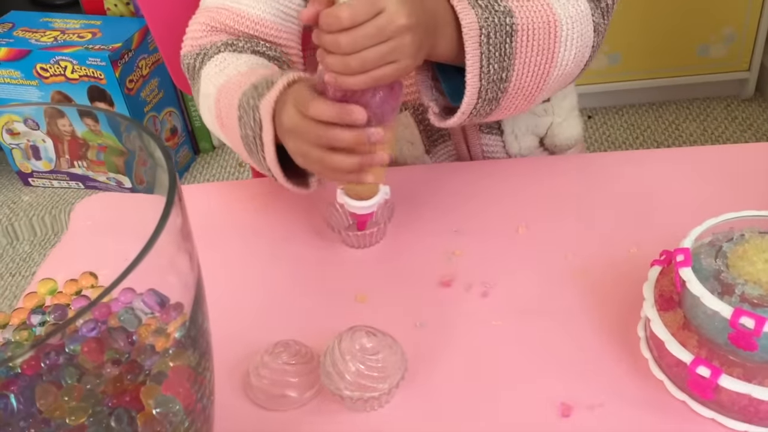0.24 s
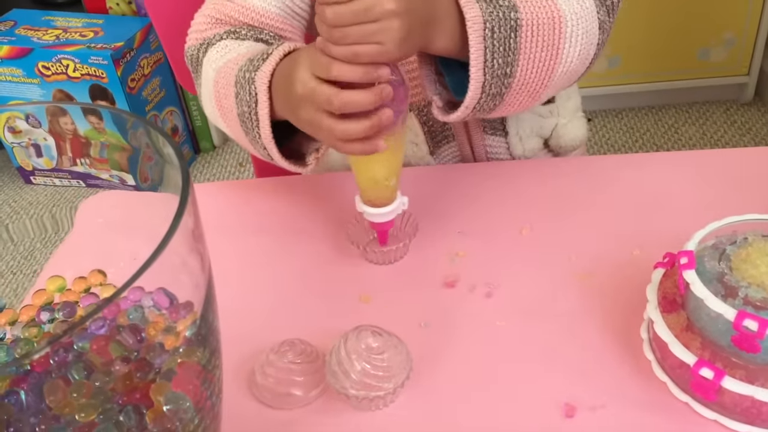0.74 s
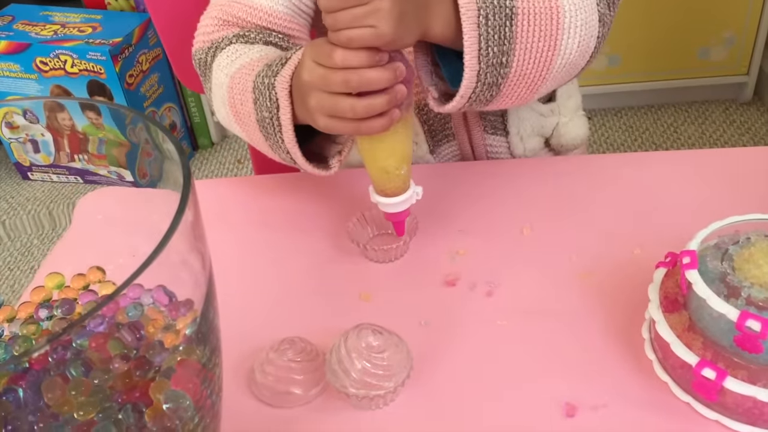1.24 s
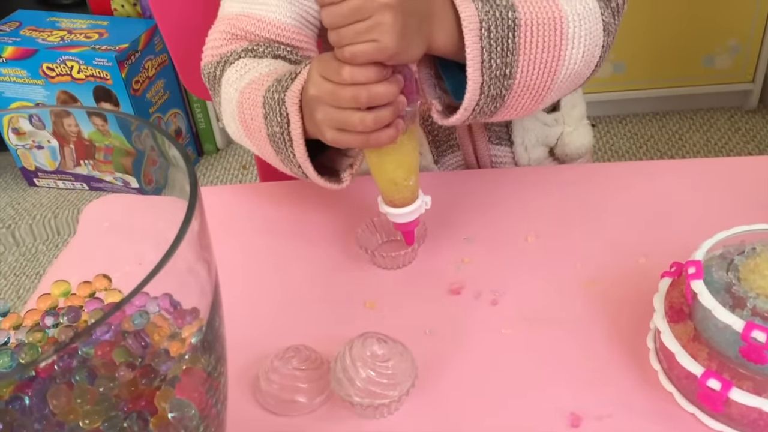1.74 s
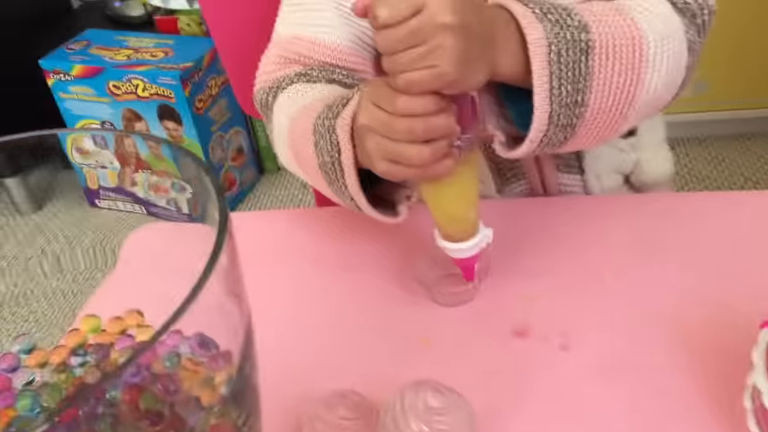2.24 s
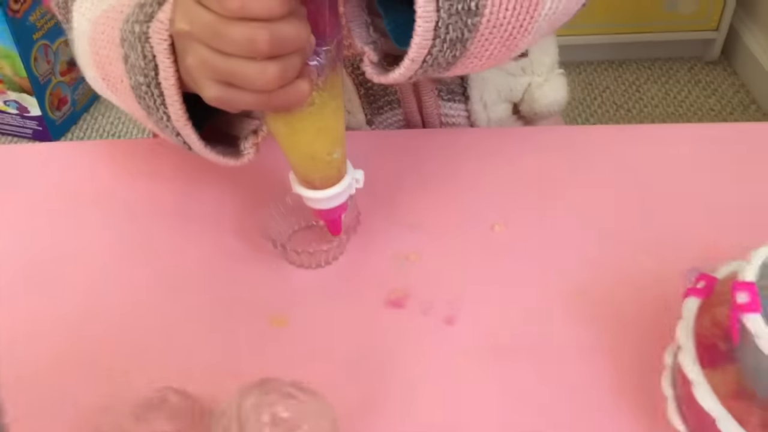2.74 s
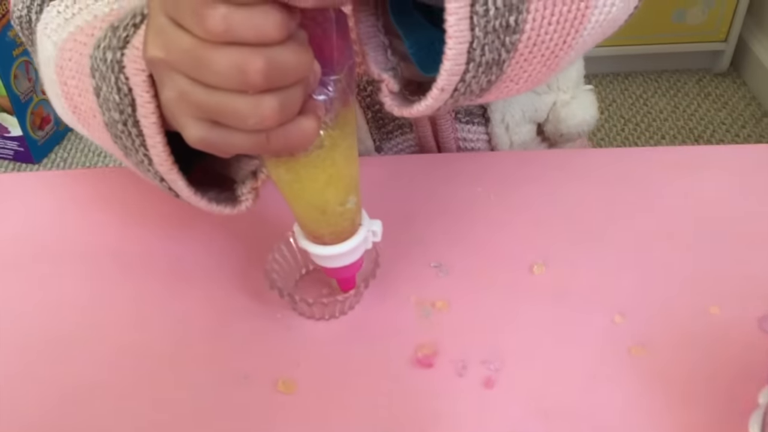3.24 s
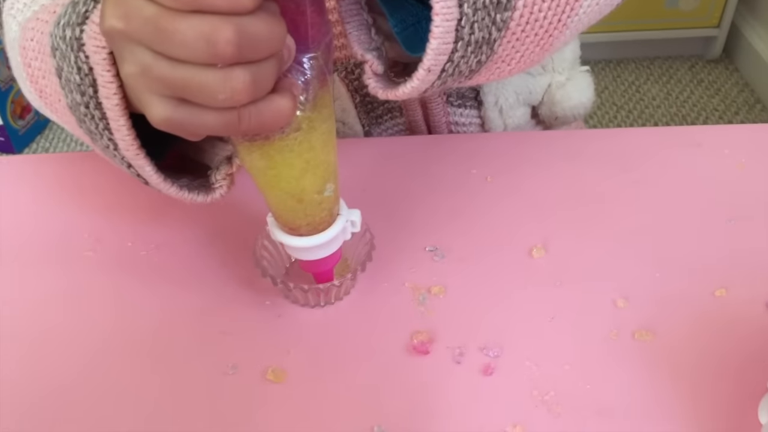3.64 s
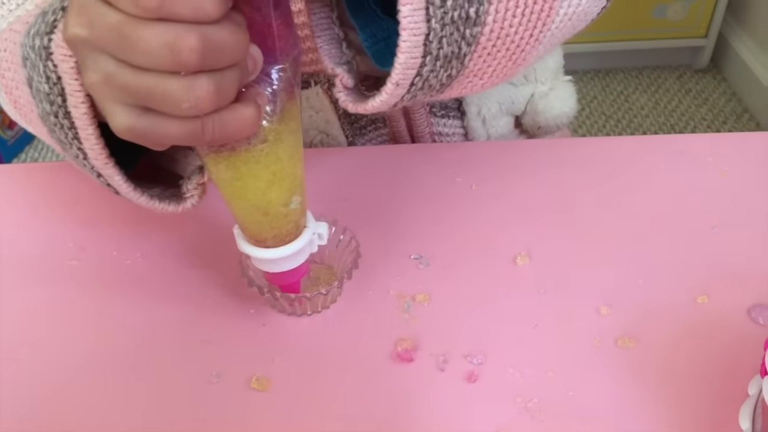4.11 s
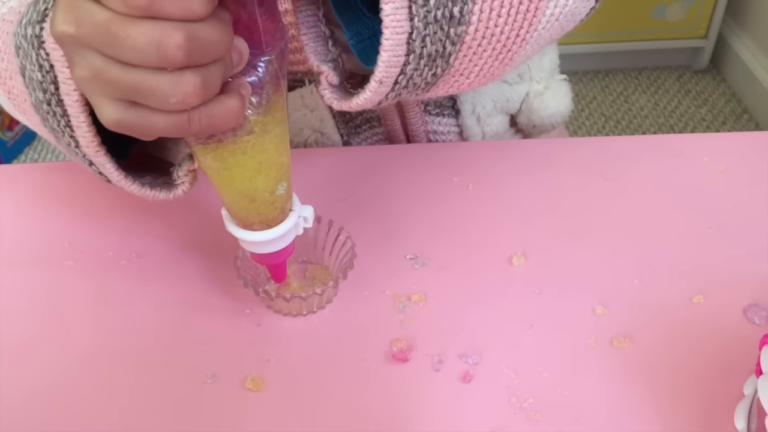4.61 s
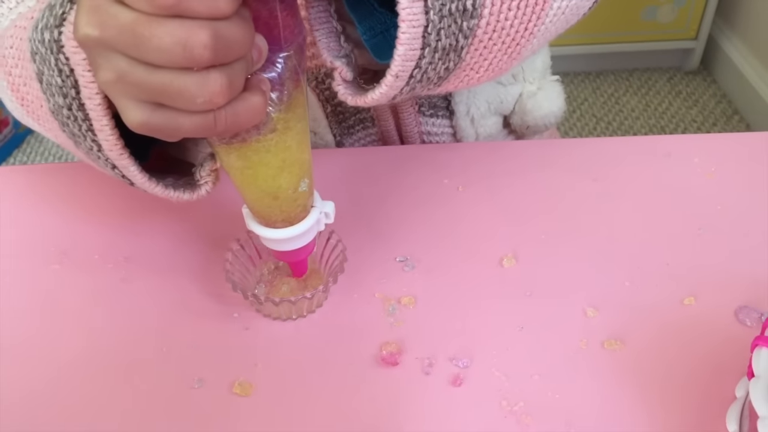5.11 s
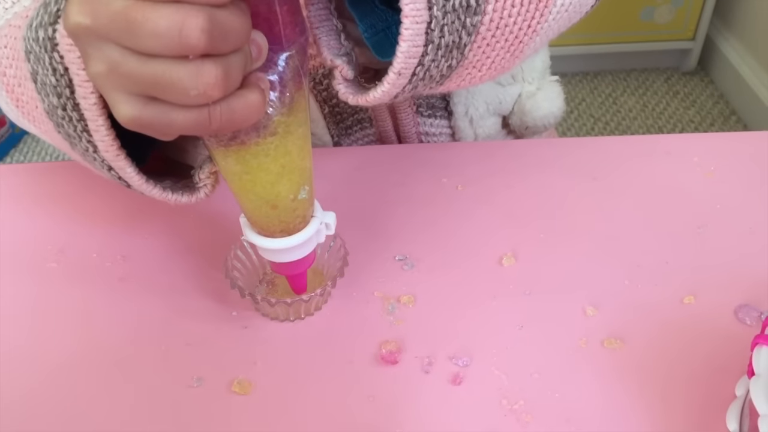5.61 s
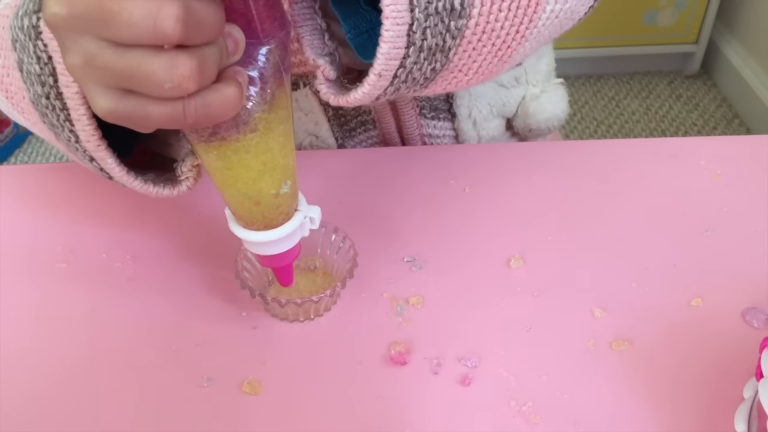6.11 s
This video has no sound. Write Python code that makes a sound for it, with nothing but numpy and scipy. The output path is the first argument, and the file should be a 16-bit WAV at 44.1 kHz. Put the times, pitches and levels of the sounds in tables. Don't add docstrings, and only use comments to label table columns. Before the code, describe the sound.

A small plastic cup is tapped and knocked down hard on a table, then wet gel beads in a squeezed bag fizz, snap and crackle.

```python
import sys
import numpy as np
from scipy import signal
from scipy.fft import rfft, irfft, next_fast_len
from scipy.io import wavfile
from scipy.ndimage import map_coordinates

SR = 44100
rng = np.random.default_rng(int(sys.argv[2]) if len(sys.argv) > 2 else 0)


def file_out(sig):
    cols = np.atleast_2d(sig).T
    lim = np.clip(cols, -1, 1)
    pcm = np.round(lim * 32767).astype(np.int16)
    wavfile.write(sys.argv[1], SR, pcm)


def volts_from_db(level):
    exponent = np.asarray(level, float) / 20
    return 10 ** exponent


N = 280476

# centre in Hz, width in Hz, level in dB.
FOLDS = [
    [(5845, 2460, 0), (7460, 2100, 0)],
    [(8950, 1940, 0), (11750, 720, -4)],
    [(14800, 10700, 0.5)],
]
# centre in Hz, width in Hz, level in dB.
CUP = [(1710, 770, -2.5), (2845, 680, 2.5), (4290, 710, -2)]
# centre in Hz, width in Hz, level in dB.
TIP = [(5400, 3500, -18), (6840, 680, 2), (9150, 960, 3.5), (10430, 760, 3), (11900, 1400, -3),
       (15000, 1300, -4.5)]
# centre in Hz, width in Hz, level in dB.
WALL = [(1475, 780, 3), (2660, 1500, 4)]


def unit(x):
    return x / np.sqrt(np.mean(x ** 2) + 1e-20)


def along(points, hz):
    f, v = np.transpose(points)
    return np.interp(np.log(hz + 1), np.log(f + 1), v)


def curves(rows, outside=None):
    s, *cols = np.transpose(rows)
    return [np.interp(np.arange(N) / SR, s, c, outside, outside) for c in cols]


def filtered(x, response):
    m = next_fast_len(N + SR // 2)
    return irfft(rfft(x, m) * response(np.fft.rfftfreq(m, 1 / SR)), m)[:N]


def ringing(x, modes):
    def response(f):
        total = 0
        for k, (centre, width, db) in enumerate(modes):
            damping = 1j * f * width
            total = total + (-1) ** k * volts_from_db(db) * damping / (centre * centre - f * f + damping)
        return total
    return filtered(x, response)


def twice(x, modes):
    return ringing(ringing(x, modes), modes)


def placed(s, shapes):
    at = np.round(np.asarray(s) * SR).astype(int)[:, None] + np.arange(shapes.shape[1])
    return np.bincount(at.ravel(), shapes.ravel(), N + SR)[:N]


def bursts(s, db, t60, attack, size=350):
    t = np.arange(size) / SR
    shapes = rng.standard_normal((len(s), size)) * volts_from_db(-60 * t / t60) * (1 - np.exp(-t / attack))
    energy = np.linalg.norm(shapes, axis=1, keepdims=True)
    return placed(s, volts_from_db(db)[:, None] * shapes / energy)


def slips(s, db, t60):
    return bursts(N / SR - s, db, t60, 0.0002, size=700)[::-1]


def pings(s, db, hz, t60, attack, size):
    t = np.arange(size) / SR
    swell = volts_from_db(-60 * t / np.reshape(t60, (-1, 1))) * (1 - np.exp(-t / attack))
    swell = swell / swell.max(axis=1, keepdims=True)
    return placed(s, volts_from_db(db)[:, None] * swell * np.sin(2 * np.pi * hz[:, None] * t))


def crackles():
    # start in seconds, peak in dB, fold size 0 large to 2 small, cup in dB.
    snaps = [(2.8629, -53, 1.9, -51), (3.3448, -45.5, 2, -64), (3.3487, -47, 1.5, -61),
             (3.5627, -49.5, 0.49, -55.0), (3.6833, -43, 0.77, -51.5), (3.7805, -55, 0.6, -50.0),
             (3.783, -44.5, 0.8, -59), (3.7862, -41.5, 0.85, -48), (3.79, -42, 0.54, -50),
             (3.9554, -41.5, 0.074, -50), (4.0716, -40.5, 1.4, -58.0), (4.1492, -40, 0.21, -47.5),
             (4.1541, -47, 1.6, -62), (4.1778, -44.0, 0.6, -73), (4.2324, -46, 1.4, -54),
             (4.2477, -46, 0.64, -56), (4.401, -38.5, 1.4, -49.5), (4.4345, -37.0, 1.6, -48.5),
             (4.446, -49, 1.2, -45.5), (4.448, -44, 1.5, -51), (4.4538, -42, 2, -54),
             (4.459, -38, 2.3, -50), (4.4644, -36.5, 1.25, -60), (4.7659, -35.5, 1.32, -57.0),
             (4.7806, -49, 1.3, -66.5), (4.8184, -41.5, 0.66, -59.5), (5.1086, -48, 1.7, -73.0),
             (5.1186, -46, 2.0, -69), (5.127, -39.5, 1.06, -66), (5.249, -37.0, 0.66, -48.5),
             (5.279, -39, 0.72, -65.5), (5.2864, -40, 0.84, -70.0), (5.304, -45, 0.87, -58),
             (5.3352, -36.5, 1, -58), (5.4232, -37.5, 0.61, -50), (5.5444, -48, 0.6, -52.5),
             (5.5548, -44, 0.21, -47), (5.565, -51, 0.3, -49), (5.5682, -58, 0.6, -53),
             (5.5722, -54, 0.54, -56), (5.6415, -43.0, 0.35, -48.5), (5.6657, -48.5, 0.7, -50),
             (5.8798, -41, 0.57, -38.5), (5.9477, -50, 0.7, -46), (5.9509, -41.5, 1.2, -58),
             (5.9595, -48, 0.7, -54.5), (6.0916, -56.5, 0.27, -48), (6.1758, -55, 0.6, -47.5),
             (6.2322, -45.5, 1.2, -46.5), (6.3486, -46, 0.31, -56.5)]
    s, db, size, cup_db = np.hstack([np.transpose(snaps), ticking(), peeling()])

    def snap(level_db):
        rise = 0.0002
        crack = bursts(s - 0.0003, level_db + 0.5, 0.004, rise)
        smear = bursts(s, level_db - 4, 0.02, rise, size=500)
        return crack + smear + slips(s, level_db - 13, 0.035)

    next_fold_db = 12
    film = 0
    for k, gain_db in enumerate((27, 24, 24)):
        distance = abs(np.clip(size, 0, 2) - k)
        film = film + twice(snap(db - next_fold_db * distance + gain_db), FOLDS[k])
    tone_hz = 2664 * (1 + 0.054 * rng.standard_normal(len(s)))
    tone = pings(s, cup_db, tone_hz, 0.0093, 0.00018, size=500)
    cup_body = twice(snap(cup_db + 22) + bursts(s, cup_db + 16.5, 0.042, 0.002, size=600), CUP)
    return film + tone + cup_body + rustling()


def rustling():
    # start in seconds, level in dB.
    rustle = [
        (.213, -65),
        (.223, -60),
        (0.248, -56),
        (.254, -60),
        (.258, -53),
        (0.267, -53),
        (0.291, -59),
        (0.298, -49),
        (.304, -58),
    ]
    s, db = np.transpose(rustle)
    large = twice(bursts(s, db + 31.5, 0.013, 0.0006), FOLDS[0][:1])
    return large + ringing(bursts(s, db + 12, 0.005, 0.0003), FOLDS[1] + FOLDS[2])


def ticking():
    # start in seconds, peak in dB, fold size 0 large to 2 small.
    ticks = [(2.0814, -55, 1.3), (2.8083, -52, 0.2), (2.8444, -56.0, 0.5), (2.8655, -44, 1.33),
             (2.8818, -50.5, 1.8), (2.9198, -51, 0.96), (2.9395, -53, 0.8), (2.9426, -58, 1.2),
             (3.0166, -56, 1.0), (3.0275, -59, 1.5), (3.0307, -57, 1.5), (3.0748, -54, 1.6),
             (3.091, -55, 0.8), (3.1107, -58.5, 1.4), (3.132, -51.5, 1.5), (3.1394, -58.5, 1.7),
             (3.2168, -58, 1.1), (3.249, -62, 1.3), (3.3524, -57, 1.5), (3.3573, -52, 2.1),
             (3.3602, -59, 1.6), (3.3701, -57.0, 1.8), (3.4144, -54, 1.2), (3.4242, -56.5, 1.0),
             (3.4689, -56.5, 1.8), (3.4744, -57.5, 1.6), (3.4792, -52.0, 1.7), (3.4838, -50, 1.6),
             (3.4867, -54.0, 0.4), (3.501, -50.5, 1.3), (3.5098, -59.0, 1.2), (3.5304, -53, 1.0),
             (3.5668, -52.0, 0.8), (3.5699, -58, 0.5), (3.6525, -64, 1.3), (3.7005, -58.5, 0.5),
             (3.7596, -51, 1.4), (3.7642, -55, 0.8), (3.8424, -45.5, 0.83), (3.881, -51, 0.5),
             (3.8849, -51, 1.7), (3.8917, -52.5, 0.46), (3.9037, -58, 1.5), (3.9194, -51, 1.0),
             (3.949, -50, 0.3), (3.9528, -57, 0.36), (3.9589, -51, 0.17), (4.0134, -57.0, 0.3),
             (4.0342, -57.5, 0.5), (4.0799, -54, 0.51), (4.0896, -50, 0.27), (4.105, -55.0, 0.7),
             (4.1586, -52, 0.7), (4.196, -53, 1.5), (4.1984, -55.0, 1.7),
             (4.2118, -52, 1.5), (4.2388, -54.0, 1.4), (4.2507, -54, 1.3), (4.2558, -47.5, 0.8),
                    (4.2607, -50.5, 1.3), (4.271, -51, 0.6), (4.2776, -57.0, 1.0), (4.2852, -54, 1.2),
                    (4.2873, -59.0, 1.0), (4.2999, -52.0, 1.5), (4.311, -51, 1.5), (4.3384, -52, 1.3),
                    (4.3651, -54.5, 1.4), (4.368, -50, 1.3), (4.3703, -50, 1.4), (4.3724, -45, 1.5),
                    (4.3915, -52, 1.9), (4.396, -47, 1.3), (4.4056, -53.0, 1.2), (4.443, -44, 1.1),
                    (4.4828, -46, 1.2), (4.5153, -51.0, 1.5), (4.5319, -55, 1.9), (4.5427, -58, 1.4),
                    (4.5776, -48.5, 1.1), (4.5852, -51, 1.6), (4.5882, -52, 1.2), (4.6353, -54.5, 1.9),
                    (4.6437, -57.0, 1.2), (4.65, -54, 1.8), (4.6602, -65, 2.0), (4.6994, -56, 1.7),
                    (4.7025, -59, 1.0), (4.7211, -59, 1.5), (4.7233, -55, 1.3), (4.7751, -61, 1.5),
                    (4.7903, -47, 1.4), (4.801, -45, 0.48), (4.8223, -50, 1.6), (4.8619, -49.0, 1.4),
                    (4.8658, -52.0, 1.4), (4.879, -54, 1.4), (4.901, -50, 1.8), (4.9035, -51, 0.33),
                    (4.925, -54, 1.3), (4.9367, -56.0, 1.2), (4.9452, -53, 0.6), (4.9514, -54, 0.6),
                    (4.957, -57, 0.4), (4.9855, -62, 1.9), (4.994, -52.5, 1.1), (5.0326, -49, 0.79),
                    (5.1067, -56, 1.2), (5.1339, -55.5, 0.9), (5.1958, -59, 1.8),
             (5.205, -46.5, 1.4), (5.2121, -52.0, 0.46), (5.23, -53, 0.4), (5.2559, -53, 1.0),
                  (5.2729, -48.5, 1.1), (5.2994, -48.0, 0.7), (5.367, -49, 0.54), (5.3908, -53, 1.3),
                  (5.41, -52.0, 0.8), (5.4384, -49, 0.5), (5.4418, -53, 0.3), (5.4641, -48, 0.4),
                  (5.4667, -53, 0.3), (5.48, -50.5, 0.22), (5.5217, -54.0, 1.4), (5.5529, -55, 0.6),
                  (5.5826, -43, 1.5), (5.6193, -53, 1.7), (5.6374, -51.5, 0.57), (5.6586, -50, 0.6),
                  (5.661, -49.5, 0.6), (5.6719, -50.5, 1.0), (5.6793, -50, 0.7), (5.6824, -50, 1.3),
                  (5.6882, -51.5, 1.2), (5.6907, -55, 1.1), (5.7268, -57, 0.8), (5.7329, -53.5, 0.7),
                  (5.741, -54.5, 0.4), (5.7547, -52.5, 0.8), (5.7698, -57, 0.4), (5.7736, -50.0, 0.78),
                  (5.7874, -58.0, 0.7), (5.7933, -47.0, 0.44), (5.8192, -50, 0.45), (5.847, -56, 0.6),
                  (5.8974, -54, 0.2), (5.937, -50, 1.0), (5.954, -49, 0.9), (5.9748, -54, 0.5),
                  (6.0116, -47, 0.7), (6.0302, -53, 0.65), (6.0649, -52, 1.5), (6.0695, -59, 1.3),
                  (6.143, -54.0, 1.2), (6.1495, -55, 0.9), (6.1671, -52, 0.8), (6.2229, -53.0, 1.0),
                  (6.2475, -51, 0.5), (6.2551, -59, 1.0), (6.2611, -50.5, 0.7), (6.2635, -54, 0.88),
                  (6.3011, -58, 1.3), (6.339, -49.0, 1.6), (6.3463, -51, 1.9)]
    s, db, size = np.transpose(ticks)
    to_cup_db = -14
    return np.array([s, db, size, db + to_cup_db])


def peeling():
    # start in seconds, length in seconds, level in dB, fold size 0 large to 2 small, cup in dB.
    peels = [(2.864, 0.074, -66, 1.4, -71), (3.343, 0.024, -57, 1.7, -73), (3.469, 0.035, -56, 1.6, -61),
             (3.561, 0.0096, -59, 0.54, -68), (3.871, 0.039, -54, 0.61, -60),
             (4.156, 0.067, -57, 0.59, -72), (4.241, 0.02, -53, 0.89, -63), (4.27, 0.054, -59, 1.5, -71),
             (4.365, 0.059, -56, 1.7, -59), (4.446, 0.049, -50, 2.6, -58), (4.579, 0.01, -60, 1.36, -73),
             (4.767, 0.036, -48, 0.99, -66), (4.864, 0.061, -55.5, 0.79, -80),
             (5.196, 0.054, -63, 1.3, -67), (5.253, 0.054, -49, 1.2, -63), (5.415, 0.11, -52, 0.23, -75),
             (5.54, 0.048, -51, 0.26, -67), (5.649, 0.057, -48, 1.1, -59), (5.73, 0.091, -64, 0.62, -63),
             (5.94, 0.033, -56, 0.93, -62), (6.007, 0.06, -50.5, 0.64, -61), (6.14, 0.081, -48, 1, -57),
             (6.208, 0.051, -50, 1, -58), (6.338, .022, -50, 0.79, -56), (5.4175, 0.0063, -52, 0.79, -58)]
    s, length, db, size, cup_db = (c[:, None] for c in np.transpose(peels))
    per_peel, bed_db, scatter_db, size_scatter = 22, -10, 2, 0.55
    when = rng.random((len(s), per_peel))
    strong, fold, cup = rng.standard_normal((3, len(s), per_peel))
    order = np.arange(per_peel)
    at = s + length * (order + when * (order > 0)) / per_peel
    film_db = db + bed_db + scatter_db * strong
    below_db = cup_db + bed_db + 3.5 + scatter_db * cup
    return np.reshape([at, film_db, size + size_scatter * fold, below_db], (4, -1))


def fizz():
    # time in seconds, pressure in dB, nozzle contact with the cup in dB.
    squeeze = [(2.7, -69, -4), (2.97, -64.5, -2), (3.21, -69, -13), (3.75, -70, -19), (3.94, -67, -21),
               (4.17, -65, -24), (4.32, -67, -5), (4.5, -66.5, -18), (5.15, -66.5, -21), (5.24, -62, -19),
               (5.36, -59.5, -6), (5.52, -61, -3.5), (5.88, -57, -8), (6.23, -59.5, -6), (6.36, -55.5, -3)]
    draw = rng.random((3600, 6))
    s = draw[:, 0] * (N / SR)
    clump = map_coordinates(rng.standard_normal(400), [draw[:, 0] * 390])
    db = 14 * draw[:, 5] ** 3 + 0.62 * np.clip(clump, -2, 1.5)

    def pops(k, modes):
        return unit(twice(bursts(s, db + 18 * draw[:, k + 1] ** 2, 0.013, 0.00013, size=130), modes))

    large, middle, small, cup = (pops(k, modes) for k, modes in enumerate(FOLDS + [CUP]))
    film_db, contact_db = curves(squeeze, -120)
    film = volts_from_db(film_db - 7) * unit(0.79 * large + middle + 1.26 * small)
    return film + volts_from_db(film_db + contact_db - 4.5) * cup


def nozzle():
    # start in seconds, peak in dB, pitch in Hz, bright part in dB, hollow part in dB.
    touches = [(0.0856, -49, 2200, -7, -35), (0.304, -45, 2720, -15, -36), (0.4162, -22, 3025, -6, -29.5),
               (0.4715, -27, 2430, -7, -22), (0.477, -37, 2300, -15, -27),
               (0.4969, -13.5, 2550, -24, -20.5), (0.5323, -35, 1580, 2.5, -18),
               (0.5641, -30, 1290, -1.5, -21), (0.676, -34, 2340, -14.5, -18.5), (0.81, -41, 1520, -8, -22),
               (1.1483, -47.5, 1800, -26, -44), (1.2038, -45, 1680, -11, -20),
               (1.7876, -44.5, 2140, 4, -42)]
    # centre in Hz, width in Hz, level in dB.
    hollow = [(606, 260, 7), (970, 390, 12), (1290, 830, 9.5)]
    s, db, hz, bright_db, hollow_db = np.transpose(touches)
    scrape = slips(s, db - 6, 0.05)
    low_hz = WALL[0][0] * (1 + 0.071 * rng.standard_normal(len(s)))
    tone = pings(s, db - 10.5, hz, 0.0072, 0.00063, size=600)
    low_tone = pings(s + 0.00032, db - 9.5, low_hz, 0.0052, 0.00032, size=600)
    wall = twice(bursts(s, db + 10.5, 0.0032, 0.00015) + scrape, WALL)
    bright = twice(bursts(s, db + bright_db + 18, 0.0072, 0.00028), TIP[1:])
    air = ringing(bursts(s, db + hollow_db + 32, 0.029, 0.00082, size=900), hollow)
    return tone + low_tone + wall + bright + air


def slam():
    # start in seconds, level in dB, t60 in seconds.
    landing = (.4977, -14, 0.43)
    # start in seconds, peak in dB, pitch in Hz.
    settles = [
        (.4964, -25.5, 1460),
        (.4985, -21, 294),
        (.5025, -20.5, 920),
        (.5045, -28.5, 590),
        (0.48, -41, 360),
    ]
    # centre in Hz, width in Hz, level in dB.
    table_top = [(176, 50, 8), (313, 70, 7), (434, 43, 5), (560, 34, -2), (650, 50, -2), (960, 71, 1),
                 (1280, 170, 0), (1630, 190, -1), (1870, 150, -5), (2380, 610, -4.5)]
    s, db, t60 = landing
    edge = twice(bursts([s], np.array([db + 14.5]), 0.0055, 0.00031), [(4760, 1850, 0.5)])
    at, peak_db, hz = np.transpose(settles)
    tones = pings(at, peak_db, hz, 12 / hz, 0.002, size=2600)
    rattle = ringing(bursts([s], np.array([db + 15.5]), t60, 0.0023, size=9000), table_top)
    return edge + tones + rattle


def rim():
    # start in seconds, peak in dB.
    rocks = [(0.75, -19), (0.75, -22.5), (0.7548, -17.5), (0.7607, -26), (0.768, -33), (0.7707, -34),
             (0.7757, -34), (0.7803, -35), (.786, -40), (.792, -40), (.799, -40), (0.804, -41),
             (0.814, -44), (.82, -43)]
    # pitch in Hz, level in dB, t60 in seconds.
    rim_modes = [(443, -17, 0.015), (1577, -9, 0.0092), (1674, -2.5, 0.0067), (1830, -7.5, 0.0077),
                 (3300, -8.5, 0.0036), (3970, -15, 0.013), (5580, -9, 0.0057)]
    # centre in Hz, width in Hz, level in dB.
    buzz_modes = [(1800, 470, -0.5), (3400, 900, 1.5), (4150, 500, 0), (5300, 630, -5)]
    s, db = np.transpose(rocks)
    scatter = rng.standard_normal((len(s), len(rim_modes)))
    duller_db = 20 * (s - s[0]) + 1.74 * (s > s[0] + 0.003)
    rings = 0
    for k, (hz, level, t60) in enumerate(rim_modes):
        mode_db = db + level + 0.96 * scatter[:, k] - duller_db * hz / 1000
        mode_hz = hz * (1 + 0.053 * scatter[:, k - 1])
        rings = rings + pings(s, mode_db, mode_hz, t60, 0.0012, size=900)
    thin = filtered(rings, lambda f: (1j * f / (900 + 1j * f)) ** 2)
    chatter = ringing(bursts(s[3:4], db[3:4] + 14, 0.22, 0.002, size=5000), buzz_modes)
    flick = ringing(slips(s[:1], db[:1] - 3, 0.047), WALL)
    clicks = ringing(bursts(s, db - 0.5 - 6 * duller_db, 0.011, 0.00024), TIP)
    return thin + chatter + flick + clicks


def thumps():
    # start in seconds, peak in dB, first pitch in Hz, rise in seconds.
    blows = [(0.489, -43, 220, 0.0046), (0.511, -13.5, 230, 0.0013), (.515, -30.5, 370, 0.0042),
             (0.503, -25, 113.3, 0.0081), (0.553, -45, 253, 0.015), (1.272, -38.5, 114, 0.0085),
             (2.02, -43, 94.5, 0.011), (2.061, -54.5, 200, 0.0074), (2.072, -50, 109, 0.009),
             (2.099, -54.5, 334, 0.002), (2.164, -46, 109, 0.0054), (2.18, -40.5, 232, 0.0017),
             (2.265, -52.5, 131, 0.0062), (2.459, -55, 180, .007), (2.491, -51.5, 258, 0.0035),
             (2.571, -44, 89.5, .008), (2.25, -49.5, 196, 0.0063), (2.379, -49, 88.5, 0.011),
             (2.562, -39.5, 280, 0.0011), (2.6054, -33, 221, 0.0014), (2.69, -53, 150, 0.0024),
             (2.681, -33, 151, 0.0024)]
    s, db, hz, rise = (c[:, None] for c in np.transpose(blows))
    u = np.arange(8000) / SR / rise
    turns = hz * rise * 3.67 * np.log(1 + u / 3.34)
    return placed(s[:, 0], -volts_from_db(db) * u * np.exp(1 - u) * np.sin(2 * np.pi * turns))


def creaks():
    # start in seconds, peak in dB, pitch in Hz, t60 in seconds.
    housing = [(1.1473, -46.5, 1740, 0.012), (1.787, -49.5, 1960, 0.013), (1.787, -42.5, 5100, 0.0058),
               (1.7877, -39.5, 3720, 0.0018), (1.7877, -39.5, 6400, 0.0065), (2.103, -51.5, 1250, 0.0061),
               (2.6043, -38.5, 680, 0.037), (2.6044, -39.5, 1177, 0.034), (2.605, -50, 1790, 0.011),
               (2.6784, -35.5, 1190, 0.022), (2.679, -35.5, 3220, 0.0029), (2.678, -39, 2060, 0.012),
               (2.6824, -39.5, 3280, 0.0039), (2.683, -37, 730, 0.013), (2.694, -54, 1120, .012)]
    s, db, hz, t60 = np.transpose(housing)
    rub = slips(s, db + 11.5, 0.085) + bursts(s, db + 9, 0.13, 0.0027, size=1800)
    scratch = ringing(rub, [(1250, 300, 1.5), (2040, 500, -1.5), (3200, 1000, -1.5)])
    crack = bursts(s, np.where(hz > 3000, db + 5, -120), 0.027, 0.00064)
    return pings(s, db, hz, t60, 0.00056, size=1500) + crack + scratch


def room(x):
    # frequency in Hz, t60 in seconds.
    decay = [(150, 0.25), (1500, 0.28), (5000, 0.23), (14000, 0.072)]
    hz, t, z = signal.stft(rng.standard_normal(SR // 2), SR, nperseg=256)
    tail = signal.istft(z * volts_from_db(-60 * t / along(decay, hz)[:, None]), SR, nperseg=256)[1]
    late = np.pad(x, (150, 0))
    return signal.fftconvolve(late, tail / np.linalg.norm(tail))[:N]


def background():
    # frequency in Hz, density in dB per Hz.
    rumble_shape = [(12, -39), (20, -39), (46, 10), (65, 6), (231, -3), (375, -6), (445, -14), (600, -14),
                    (780, -20), (1320, -120)]
    # frequency in Hz, density in dB per Hz.
    hiss_shape = [(120, -7), (200, -2.5), (350, -10.5), (600, -12), (1500, -12.5), (4000, -15.5),
                  (5000, -17.5), (6200, -15.5), (7800, -21), (9200, -19), (10500, -24), (12000, -19.5),
                  (15500, -24), (16500, -36)]
    # time in seconds, level in dB.
    drone = [(0, -66), (1.5, -67), (2.3, -68), (3.1, -67.5), (3.5, -65.5), (4.1, -65), (4.8, -63.5),
             (6.36, -62.5)]
    # time in seconds, peak in dB, swell and fade in dB per second.
    hand_grips = [
        (.58, -50.5, 127),
        (2.2, -58.5, 53.5),
        (2.62, -57, 67),
    ]

    def steady(shape):
        return unit(filtered(rng.standard_normal(N), lambda hz: volts_from_db(along(shape, hz))))

    lumps = map_coordinates(rng.standard_normal(100), [np.arange(N) * 90 / N])
    grips = sum(volts_from_db(db - fade_db * abs(np.arange(N) / SR - s)) for s, db, fade_db in hand_grips)
    swell = np.hypot(volts_from_db(curves(drone)[0]), grips) * volts_from_db(1.4 * lumps)
    return swell * steady(rumble_shape) + volts_from_db(-65) * steady(hiss_shape)


def scene():
    bag = crackles() + fizz()
    knocks = nozzle() + slam()
    flick = rim()
    blows = thumps()
    answer = room(volts_from_db(-15) * knocks + volts_from_db(-23) * flick + volts_from_db(-18.5) * blows + volts_from_db(-15.5) * bag)
    return (knocks + flick + blows + bag + answer + creaks() + background())[None]


def roll_off(x):
    return signal.sosfilt(signal.butter(12, 16830, fs=SR, output="sos"), x)


def record(dry):
    def microphone(hz):
        bass_cut = (1j * hz / (40 + 1j * hz)) ** 3
        return bass_cut * np.where(hz < 15850, 1, volts_from_db(-34))

    heard = filtered(dry[0], microphone)
    return roll_off(heard[None])


dry = scene()
out = record(dry)
file_out(out)
```